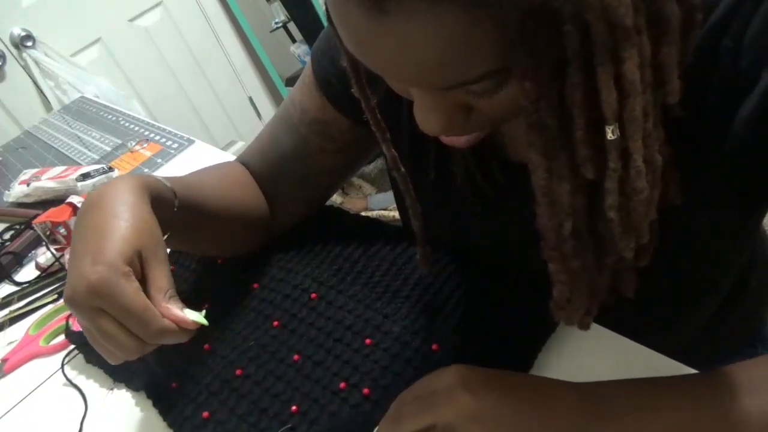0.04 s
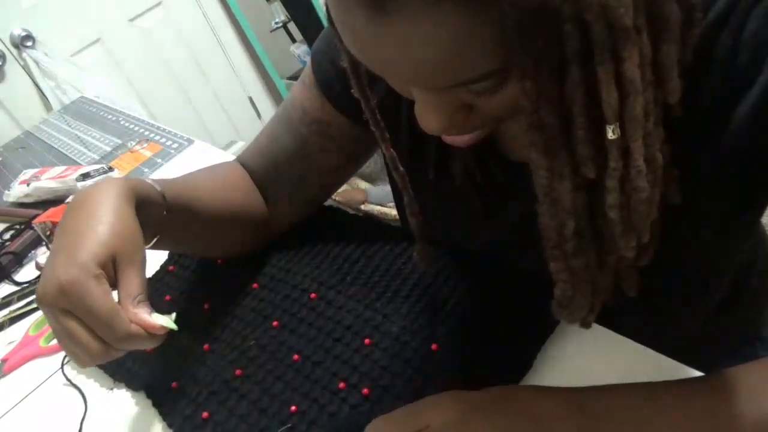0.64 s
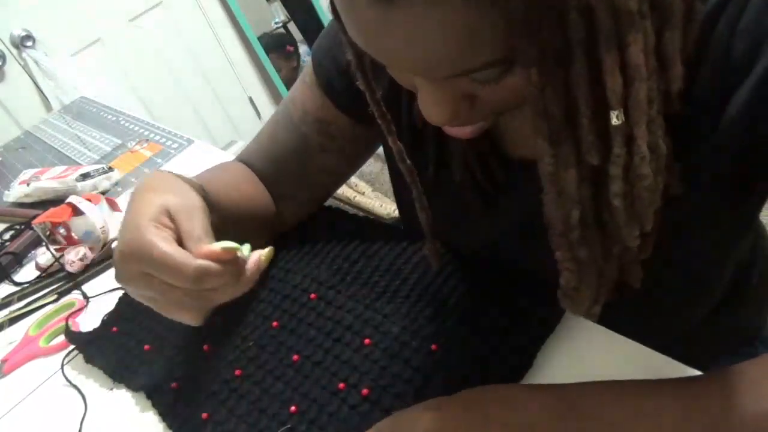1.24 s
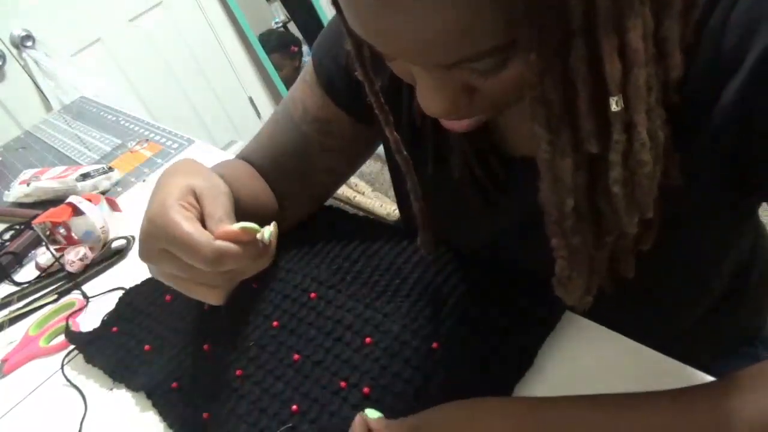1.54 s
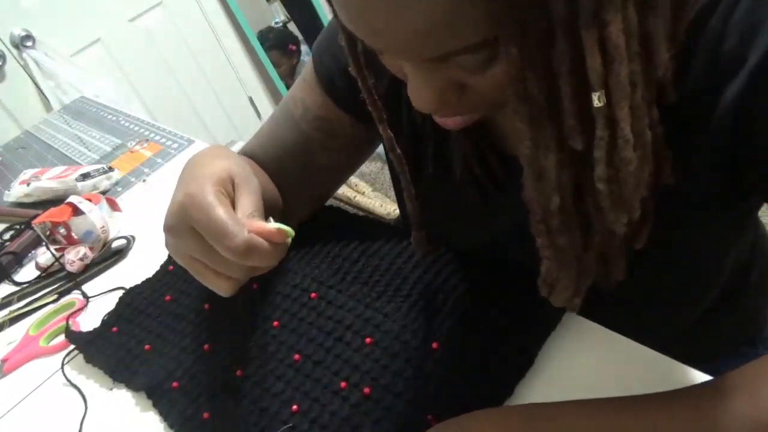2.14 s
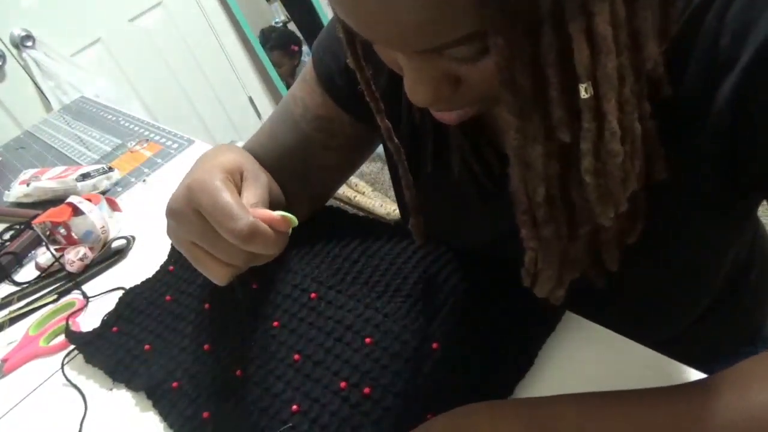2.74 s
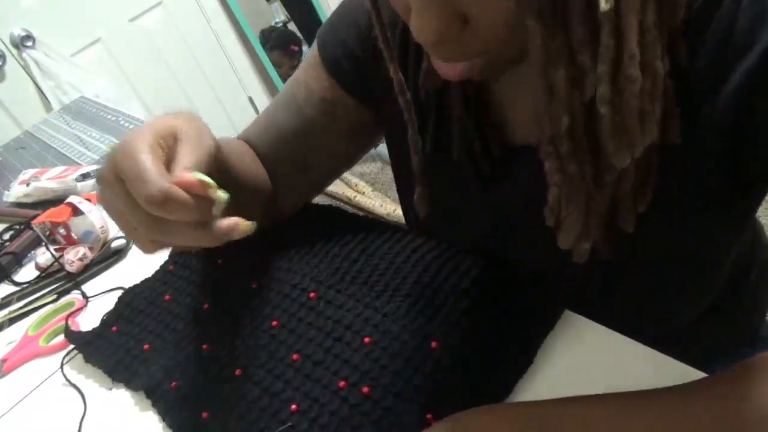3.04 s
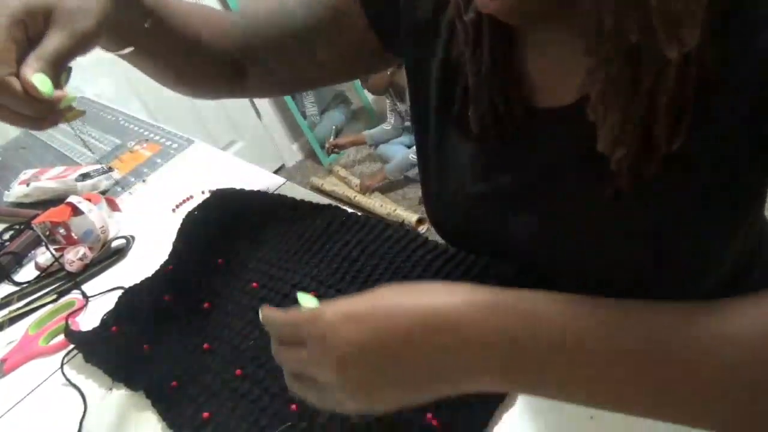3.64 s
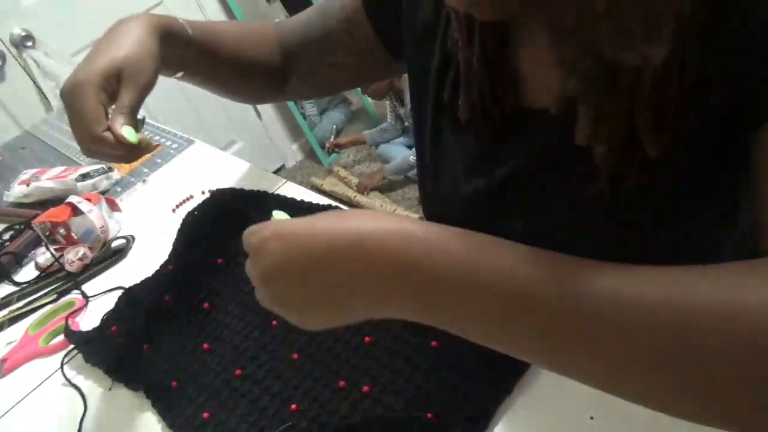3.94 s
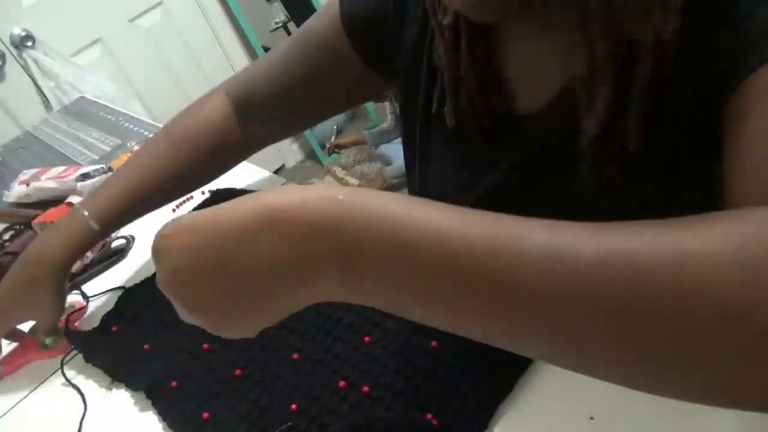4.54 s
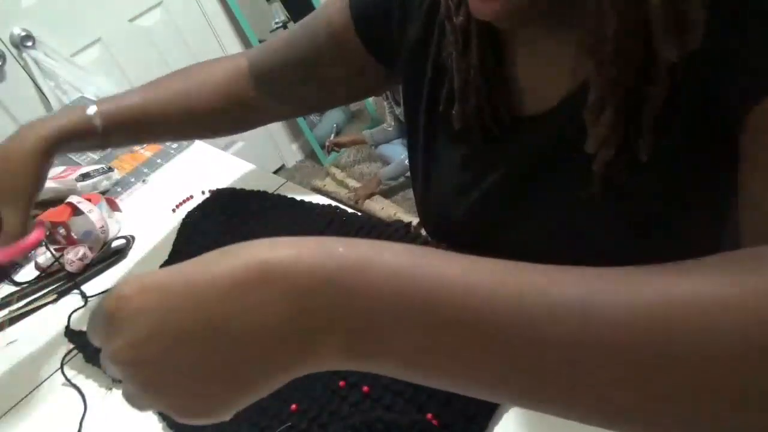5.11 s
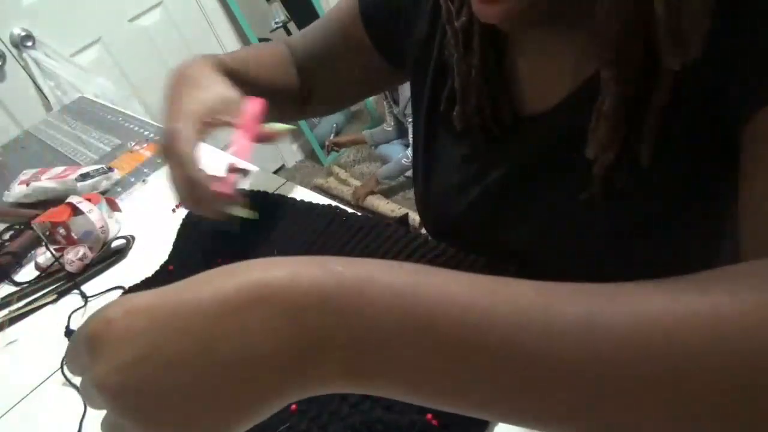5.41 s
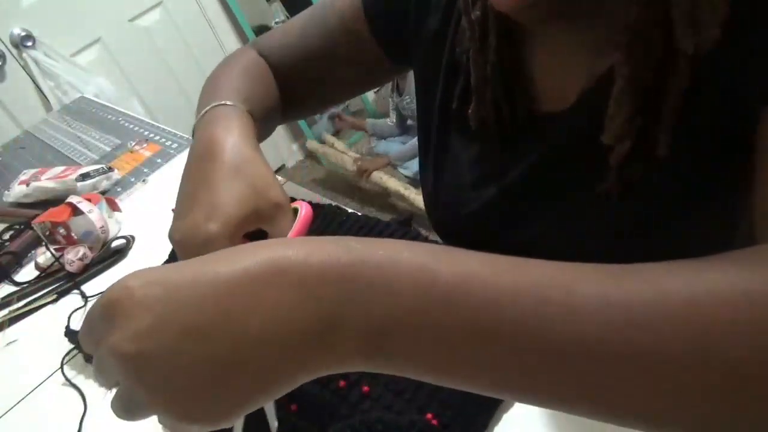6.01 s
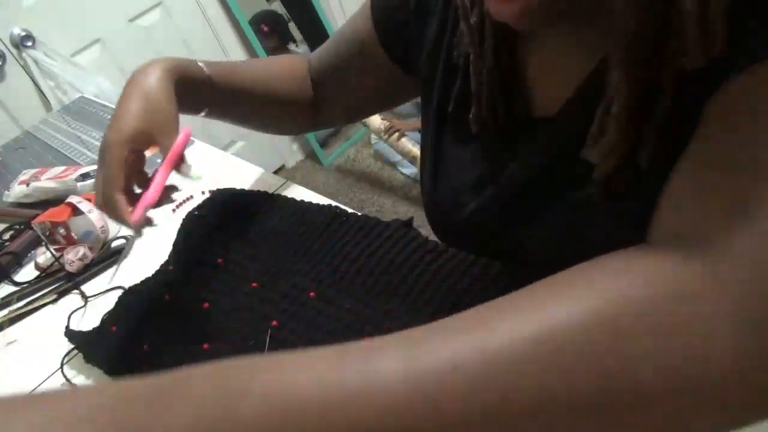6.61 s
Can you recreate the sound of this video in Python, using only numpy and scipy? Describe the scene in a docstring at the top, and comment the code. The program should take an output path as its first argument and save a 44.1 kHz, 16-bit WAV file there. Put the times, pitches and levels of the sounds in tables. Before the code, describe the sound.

Beads and fingernails click lightly as a thread is drawn through knitted yarn with a brief rasp. After a quieter stretch of scattered ticks and rustles, a hand lands on the table with a soft thud and scissors knock against it. The scissors scrape off the tabletop and clack open, and a few short rustles follow. The microphone hears it indirectly in a small room, over faint steady hiss.

```python
"""Scissors scrape off a work table and clack open during beading in a small room. Before that, thread rubs
through knitted yarn and beads and fingernails click; as the scissors slide on the table, its top hums. Rubbing
is many tiny slips; a click is one short burst of noise that rings. The microphone faces away from the work, so
most sounds arrive by way of the walls, over a faint steady hiss."""
import sys
import numpy as np
from scipy import signal
from scipy.fft import rfft, irfft
from scipy.io import wavfile
from scipy.ndimage import uniform_filter1d

SR = 44100
rng = np.random.default_rng(int(sys.argv[2]) if len(sys.argv) > 2 else 0)


def to_wav(s):
    """Save 16-bit WAV."""
    ch = np.atleast_2d(s).T  # columns
    pcm = np.round(np.clip(ch, -1, 1) * 32767)  # PCM
    wavfile.write(sys.argv[1], SR, pcm.astype(np.int16))


N = 298116

# The scissors knock, are gripped and open: time_s, level_db, treble_db, contact_ms, pitch_hz
SCISSOR_HITS = [(4.3646, -39.5, -12.5, 0.95, 3030), (4.4126, -39, -3, 2.8, 1970),
                (4.4290, -32, -6, 0.96, 3630), (4.4425, -35, -7.5, 3.4, 2200), (4.6295, -53, -8, 1, 4400),
                (4.693, -49, -14, 15, 4640), (4.729, -46.5, -18.5, 5.5, 1550), (5.123, -33.5, 3, 7.4, 2020),
                (5.185, -35, -0.5, 2.8, 955), (5.1923, -34, -2.5, 1.5, 4000), (5.318, -42, 4, 11, 1740),
                (5.334, -41, 4, 2.3, 8600), (5.597, -27, 5.5, 0.68, 9060)]


def undb(db):
    """Turn decibels into a number to multiply a sound by."""
    return 10 ** (np.asarray(db) / 20)


def level(x, db):
    """Scale a sound to an average (rms) level; the room and the mix can change it later."""
    return x * undb(db) / np.sqrt(np.mean(x ** 2))


def along(points, hz):
    """Read between (frequency_hz, value) points, giving every octave equal space."""
    point_hz, value = np.transpose(points)
    return np.interp(np.log(hz + 1), np.log(point_hz), value)


def add(track, time_s, x):
    """Mix x into the track from time_s on."""
    start = int(round(time_s * SR))
    x, start = x[..., max(-start, 0):], max(start, 0)
    track[..., start:start + x.shape[-1]] += x[..., :N - start]


def tint(x, colour, bass_db=0, treble_db=0, bass_hz=800, treble_hz=4200, size=4096):
    """Shape a sound's tone with a colour curve, plus bass and treble controls."""
    hz = np.fft.rfftfreq(size, 1 / SR)
    bass = bass_db / (1 + (hz / bass_hz) ** 2)
    treble = treble_db * hz ** 2 / (hz ** 2 + treble_hz ** 2)
    cepstrum = irfft(np.log(undb(along(colour, hz) + bass + treble)))
    # folding onto the first half puts all ringing after the hit, none before it
    cepstrum[1:size // 2] *= 2
    cepstrum[size // 2 + 1:] = 0
    return signal.fftconvolve(x, irfft(np.exp(rfft(cepstrum))))[:len(x)]


def ring(x, pitch_hz, width_hz):
    """Let a sound ring at one pitch; a narrower width rings longer."""
    return signal.lfilter(*signal.iirpeak(pitch_hz, pitch_hz / width_hz, fs=SR), x)


def top_cut(x, top_hz=11100):
    """Cut off the treble above the microphone's range."""
    return signal.sosfilt(signal.ellip(10, .2, 70, top_hz, fs=SR, output="sos"), x)


def even(x, size=5):
    """Even out the chance peaks in a noise burst's tone over `size` neighbouring frequencies."""
    count = x.shape[-1]
    spectrum = rfft(x, 2 * count)
    nearby_power = uniform_filter1d(abs(spectrum) ** 2, size)
    return irfft(spectrum / np.sqrt(nearby_power + 1e-12))[..., :count]


def pair(mid, side, width):
    """Make left and right: mid is what they share, side is what sets them apart."""
    return mid + tint(side, width) * np.array([[1], [-1]])


def hiss():
    """The steady noise of the quiet room and the microphone."""
    # Tone of the noise: frequency_hz, gain_db
    colour = [(15, -78), (25, -15), (85, -17), (107, -15.5), (182, -7), (229, -9), (327, -4.5), (433, -8),
              (619, -2.5), (703, -6), (979, -3), (1760, -6), (3240, -6.5), (3590, -8.5), (11000, -14),
              (14300, -70), (22000, -120)]
    # Stereo width of the noise: frequency_hz, side_gain_db
    width = [(60, -31), (110, -7), (190, -10.5), (340, -3.5), (610, -2), (1090, 0.5), (1940, -2.5),
             (3470, -4.5), (6190, -8), (11000, -10.5)]
    mid, side = (level(tint(rng.standard_normal(N), colour), db=-66) for _ in range(2))
    return pair(mid, side, width)


def room(dry, tail_db=-1.97, build_ms=6, early_db=3, early_ms=14):
    """A weak direct sound, a few echoes off the walls, then a dense tail whose treble dies first."""
    # Time the echoes take to fade by 60 dB: frequency_hz, fade_s
    fade_times = [(150, 0.37), (400, 0.4), (1000, 0.38), (2800, 0.32), (7000, 0.22), (11000, 0.32)]
    # Stereo width of the echoes: frequency_hz, side_gain_db
    width = [(150, -25), (350, -17), (700, -12.5), (1400, -7.5), (10000, -8)]
    # The direct path and the first echoes: delay_ms, gain_db, left_minus_right_db
    paths = [(0, -24, 2), (2.3, -9, 0.5), (8.5, -13.5, 5), (9.4, -18, -6)]
    t = np.arange(16384) / SR
    ms = 1000 * t
    hz = np.fft.rfftfreq(len(t), 1 / SR)
    bands_hz = np.geomspace(150, 9600, 5)
    fades = [np.exp(-np.log(1000) * t / along(fade_times, centre)) for centre in bands_hz]
    build_up = (1 - np.exp(-(ms + .5) / build_ms)) ** 0.25
    early_boost = undb(early_db * np.exp(-ms / early_ms))
    noise = rng.standard_normal((2, len(t)))
    echoes = rfft(even(noise * build_up * early_boost * fades[0], size=41))
    tail = 0
    for fade, weight in zip(fades, np.eye(len(bands_hz))):  # each band fades at its own pace
        band = irfft(echoes * np.interp(np.log(hz + 1), np.log(bands_hz), weight))
        tail = tail + band * fade / fades[0]
    response = pair(*tail, width) * undb(tail_db) / np.linalg.norm(tail[0])
    for delay_ms, db, pan_db in paths:
        response[:, np.searchsorted(ms, delay_ms)] += undb(db + np.array([pan_db, -pan_db]) / 2)
    return signal.fftconvolve(dry[None], response, axes=1)[:, :N]


def contact(contact_ms):
    """Two things touch: a burst of tiny impacts that dies away quickly."""
    t = np.arange(SR // 20) / SR
    return even(rng.standard_normal(len(t)) * np.exp(-1000 * t / contact_ms))


def knocks(rows):
    """Each touch makes an object ring briefly at one pitch."""
    out = np.zeros(N)
    for time_s, db, hz, contact_ms, width_ratio in rows:
        width_hz = min(width_ratio * hz, SR / 4)
        ringing = ring(contact(contact_ms), hz, width_hz)
        ringing = ring(ringing, hz, width_hz)  # a second pass makes the pitch clearer
        add(out, time_s, level(top_cut(ringing), db))
    return out


def small_ticks(hard_ms=2, lag_s=0.0018, gain_db=-8, tick_ms=1.5, width_ratio=0.36):
    """Needle and blades tick on their own, and with each scissor hit shorter than hard_ms."""
    # Needle and blade ticks: time_s, level_db, pitch_hz, contact_ms, width_ratio (width over pitch)
    ticks = [(1.6535, -76, 9550, 0.82, .5), (3.04, -68, 7300, 1, .5), (3.06, -66, 6700, 1.5, 0.55),
             (6.176, -61.5, 10100, 4.6, 0.68), (6.2506, -50.5, 4300, 1, 1.4), (6.524, -65, 4230, 5.6, 0.25),
             (6.531, -63, 8800, 3.3, 0.19), (6.711, -58, 8700, 2, 0.41)]
    with_clacks = [(time_s + lag_s, db + gain_db, hz, tick_ms, width_ratio)
                   for time_s, db, _, contact_ms, hz in SCISSOR_HITS if contact_ms < hard_ms]
    return knocks(ticks + with_clacks)


def friction(count, slips_per_s, spread_db=4, smooth=0.95):
    """Surfaces catch and slip at random, over a hiss whose strength is `smooth`."""
    dice = np.random.default_rng(rng.integers(2 ** 31))
    size_draw, time_draw = dice.random((count, 2)).T
    size = undb(spread_db * np.minimum(-np.log(size_draw), 4))
    slips = (time_draw < slips_per_s / SR) * size * dice.choice([-1, 1], count)
    return level(slips + 1e-9, db=0) + smooth * dice.standard_normal(count)


def stroke(rise_s, slips_per_s):
    """One rub: its friction, its swell and the time to its peak. Slow rubs also end slowly."""
    lead_s, fall_s = 5 * rise_s, .017 + .45 * rise_s
    t = np.arange(-lead_s, 6 * fall_s, 1 / SR)
    swell = np.exp(np.minimum(t / rise_s, -t / fall_s))
    return friction(len(t), slips_per_s), swell, lead_s


def table_pushes():
    """The scissors slide and push on the table, whose top hums at its own pitches."""
    # Pitches the table top rings at: pitch_hz, width_hz, gain_db
    tones = [(151, 79, -6), (258, 27, 3), (345, 39, 3), (435, 16, 0), (480, 20, 3.5), (636, 14, -1),
             (1133, 47, 7), (1200, 27, -14)]
    # Soft pushes of the scissors: peak_s, rise_s, level_db
    pushes = [(4.37, 0.0021, -31), (4.435, .02, -33.5), (4.54, .05, -42), (4.638, .03, -44),
              (4.749, 0.026, -45.5)]
    colour = [(95, -13), (135, -1.5), (1300, 2.5), (4000, 2.5)]  # frequency_hz, gain_db
    kick = signal.unit_impulse(SR // 4)
    hum = tint(sum(undb(db) * ring(kick, hz, width_hz) for hz, width_hz, db in tones), colour)
    hum /= np.linalg.norm(hum)
    out = np.zeros(N)
    for peak_s, rise_s, db in pushes:
        grain, swell, lead_s = stroke(rise_s, slips_per_s=900)
        add(out, peak_s - lead_s, signal.fftconvolve(swell * level(grain, db), hum))
    return out


def table_bumps(contact_ms=22):
    """Arm and hand bump the table; the long, soft contact sounds dull."""
    # Bumps on the table: time_s, level_db, pitch_hz, width_ratio (width over pitch)
    bumps = [(1.778, -49.5, 614, 0.24), (1.80, -63, 239, 0.85), (2.321, -58.5, 267, 1.24),
             (4.373, -41, 1176, 0.21), (4.737, -48, 485, 0.17)]
    return knocks([(time_s, db, hz, contact_ms, width) for time_s, db, hz, width in bumps])


def rasp(grain, bass_db, treble_db, pitch_hz, ring_db):
    """Friction makes the rubbed thing ring a little; thread and steel are brighter than yarn."""
    # Tone of rubbing: frequency_hz, gain_db
    colour = [(60, -37.5), (200, -26.5), (330, -11.5), (550, -5), (830, -1), (1200, -2), (1900, -0.5),
              (3200, -3.5), (5500, -6), (8000, -7), (11000, -16.5)]
    rubbing = tint(grain, colour, bass_db, treble_db)
    ringing = undb(ring_db) * ring(rubbing, pitch_hz, width_hz=0.19 * pitch_hz)
    return level(top_cut(rubbing + ringing), db=0)


def short_rubs():
    """Thread, yarn and blades rustle in short strokes."""
    # Single rubs: peak_s, rise_s, level_db, treble_db
    rubs = [(0.185, 0.0043, -55, 3), (0.402, 0.0065, -43.5, 7.5), (0.43, 0.0087, -43, 8),
            (0.549, 0.032, -45.5, -13), (1.35, 0.26, -65.5, 7), (1.773, 0.0089, -51.5, -21),
            (2.995, 0.011, -53, 16), (3.466, 0.0098, -60.5, 7), (3.655, 0.032, -56, 9),
            (3.9, 0.066, -55, 15), (3.944, .013, -44.5, 4), (4.32, 0.072, -57.5, 7), (4.5, 0.06, -41, -8),
            (4.808, 0.05, -55, 13), (5.529, 0.019, -33, 14.5), (5.581, 0.019, -35, 7),
            (5.797, 0.011, -37.5, 5), (5.85, 0.014, -44.5, 2), (5.955, 0.0061, -44.5, -1.5),
            (6.014, 0.016, -52, 11), (6.089, 0.017, -49, 4.5), (6.229, 0.004, -43.5, 6.5),
            (6.368, 0.017, -44, -1), (6.52, 0.014, -56, 10)]
    out = np.zeros(N)
    for peak_s, rise_s, db, treble_db in rubs:
        grain, swell, lead_s = stroke(rise_s, slips_per_s=1600)
        rustle = rasp(grain, bass_db=1.5, treble_db=treble_db, pitch_hz=2370, ring_db=-4)
        add(out, peak_s - lead_s, undb(db) * swell * rustle)
    return out


def drag(curve, gain_db, slips_per_s, spread_db, smooth, lead_s=.014, **tone):
    """Long friction along a loudness curve, begun lead_s early as the room takes time to fill."""
    out = np.zeros(N)
    times, db = np.transpose(curve)
    t = np.arange(times[0], times[-1], 1 / SR)
    swell = undb(gain_db + np.interp(t, times, db))
    grain = friction(len(swell), slips_per_s, spread_db, smooth)
    add(out, times[0] - lead_s, swell * rasp(grain, **tone))
    return out


def thread_pull():
    """A long thread catches on fibres as it is pulled through the knit."""
    # Loudness of the pull: time_s, level_db
    curve = [(0.618, -38.5), (0.712, -29), (0.748, -44), (0.79, -29), (0.812, -44), (0.96, -58)]
    return drag(curve, gain_db=-1.5, slips_per_s=700, spread_db=6, smooth=0.57,
                bass_db=-5.5, treble_db=-2, pitch_hz=782, ring_db=-11)


def scissor_slide():
    """The steel scissors scrape across the table and off it."""
    # Loudness of the scrape: time_s, level_db
    curve = [(4.95, -57), (5.068, -52), (5.136, -32), (5.182, -41), (5.192, -27.5), (5.31, -55.5),
             (5.338, -34.5), (5.402, -53.5), (5.46, -46)]
    return drag(curve, gain_db=-2.5, slips_per_s=1600, spread_db=4, smooth=0.46,
                bass_db=-6.5, treble_db=3, pitch_hz=960, ring_db=-2)


def taps(rows, bass_db, ring_db=-1):
    """Hard, light things meet: a crack and a short ring, each from its own spot in the room."""
    # Tone of the crack: frequency_hz, gain_db
    colour = [(60, -36), (190, -34), (300, -10), (600, -0.5), (1150, 1), (1800, 3), (2800, 3), (4000, 2),
              (7000, 0), (10000, -6), (11500, -24)]
    out = np.zeros((2, N))
    for time_s, db, treble_db, contact_ms, hz in rows:
        crack = tint(contact(contact_ms), colour, bass_db, treble_db)
        ringing = undb(ring_db) * ring(crack, hz, width_hz=0.18 * hz)
        add(out, time_s, room(level(top_cut(crack + ringing), db)))
    return out


def bead_clicks():
    """Beads and fingernails meet in thin clicks with little bass."""
    # Single clicks: time_s, level_db, treble_db, contact_ms, pitch_hz
    clicks = [(0.1458, -57.5, -14, 1.2, 2270), (0.512, -41, -15, 5.6, 2350), (0.709, -36, -7, 3, 1630),
              (1.742, -64.5, -8, 2.2, 3100), (1.7763, -35.5, 2, 3.1, 1790), (1.7789, -37.5, 2, 1.1, 3900),
              (2.2026, -53, -32, 8.3, 1120), (2.3966, -39, 2, 3.5, 1120), (3.949, -48, -18, 3.2, 2220)]
    return taps(clicks, bass_db=-13.5)


def scissor_clacks():
    """The scissors knock on the table and clack open, with more bass than the beads."""
    return taps(SCISSOR_HITS, bass_db=2.5)


def scene(tick_room_db=-7, thud_room_db=-4, thud_direct_db=-3, left_minus_right_db=0.4):
    """The handwork fills the room; ticks arrive mostly direct, thuds also through the table."""
    ticks = small_ticks()
    thuds = table_pushes() + table_bumps()
    rubbing = thread_pull() + scissor_slide() + short_rubs()
    direct = ticks + undb(thud_direct_db) * thuds
    walls = room(rubbing + undb(tick_room_db) * ticks + undb(thud_room_db) * thuds)
    balance = undb(np.array([[1], [-1]]) * left_minus_right_db / 2)
    return (bead_clicks() + scissor_clacks() + direct + walls + hiss()) * balance


def record(dry):
    """The microphone loses the highest treble."""
    return top_cut(dry)


dry = scene()
out = record(dry)
to_wav(out)
```